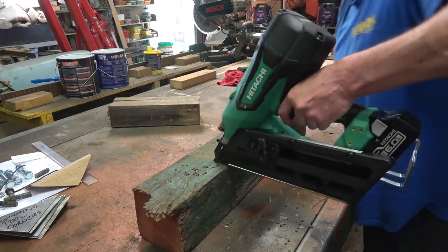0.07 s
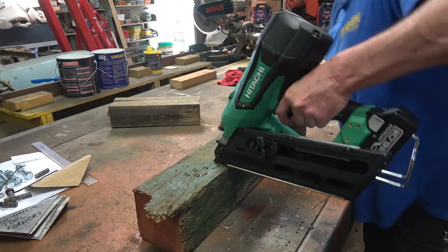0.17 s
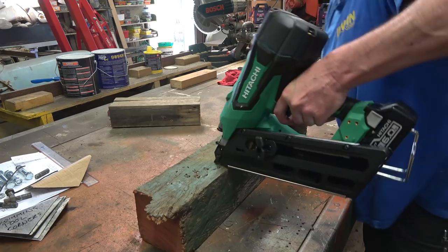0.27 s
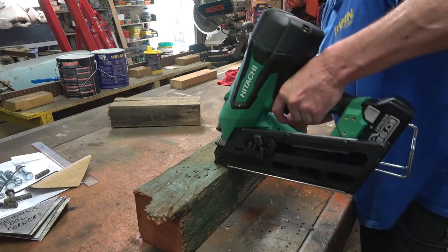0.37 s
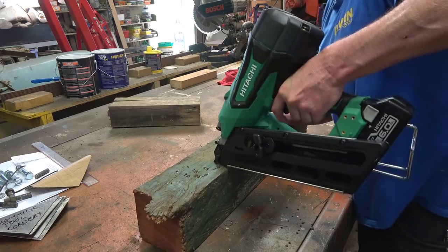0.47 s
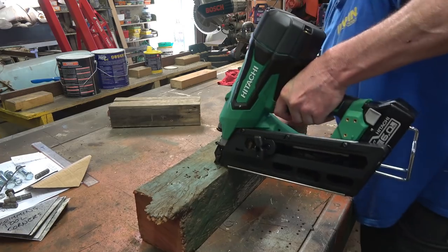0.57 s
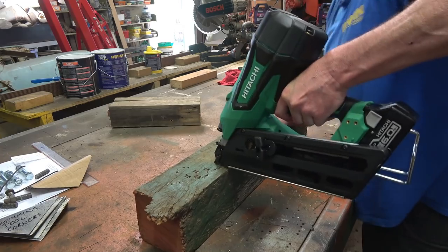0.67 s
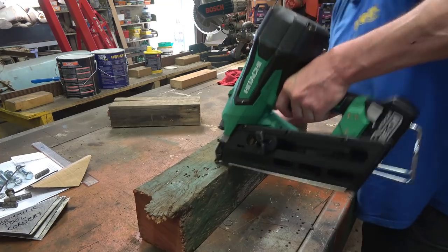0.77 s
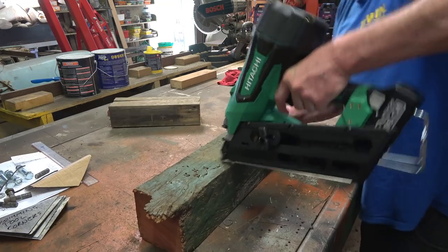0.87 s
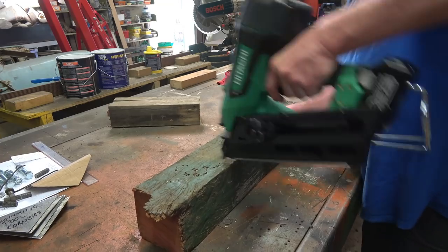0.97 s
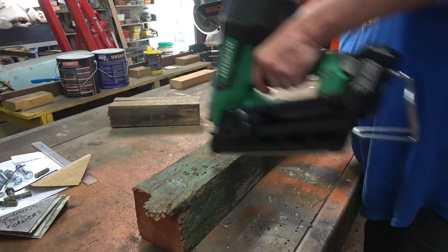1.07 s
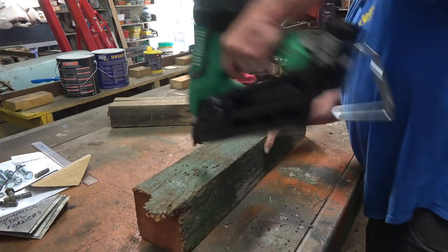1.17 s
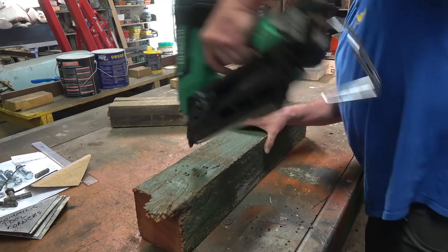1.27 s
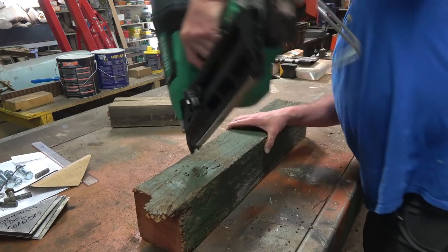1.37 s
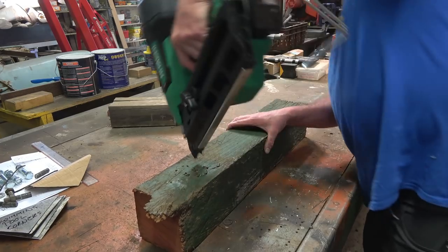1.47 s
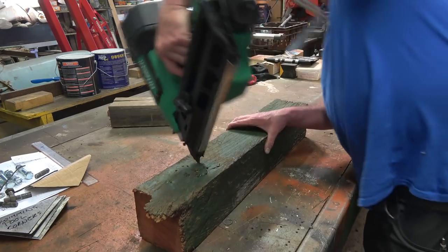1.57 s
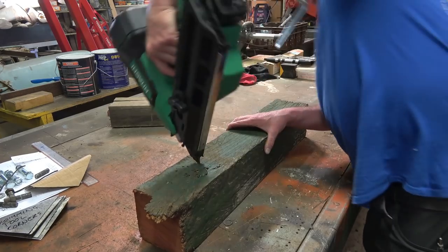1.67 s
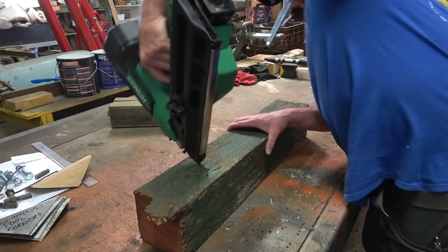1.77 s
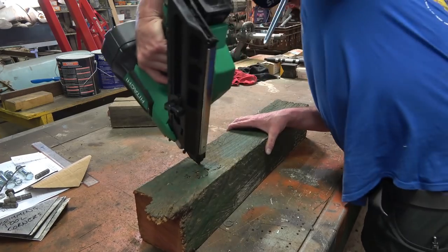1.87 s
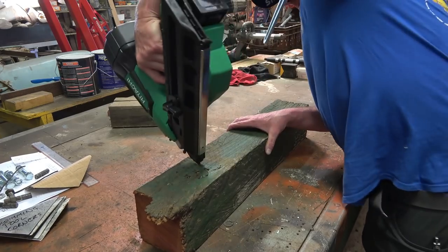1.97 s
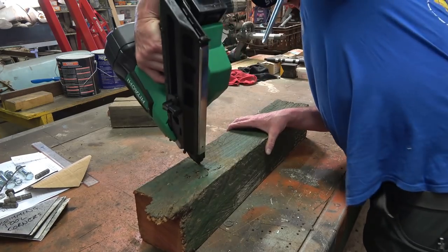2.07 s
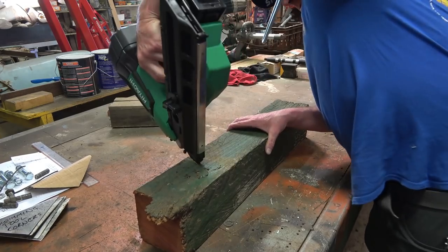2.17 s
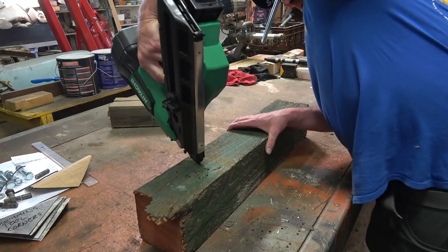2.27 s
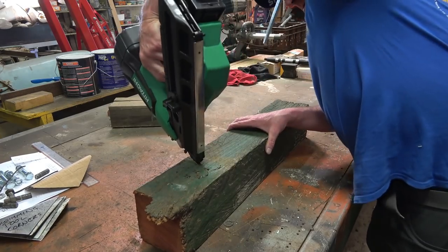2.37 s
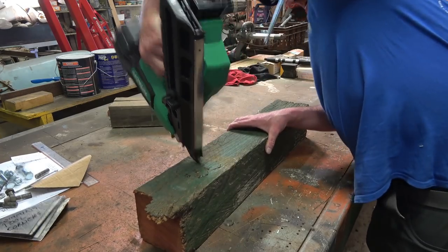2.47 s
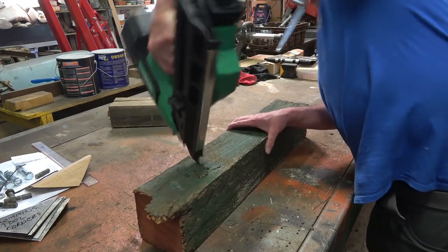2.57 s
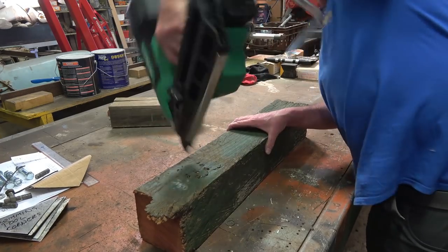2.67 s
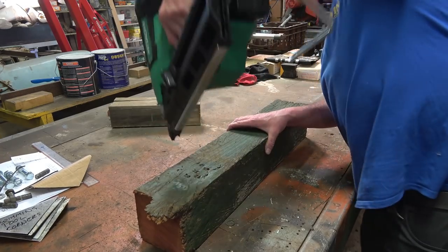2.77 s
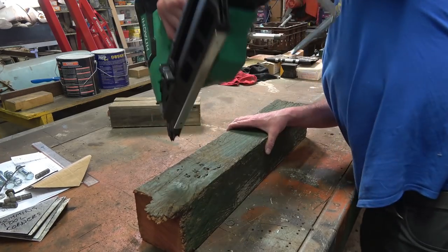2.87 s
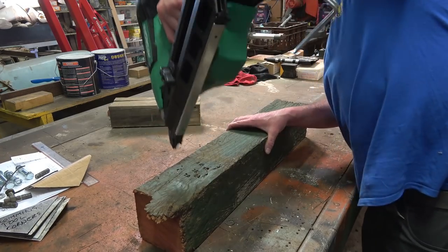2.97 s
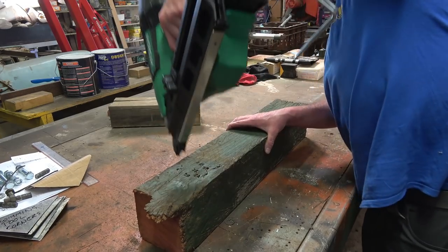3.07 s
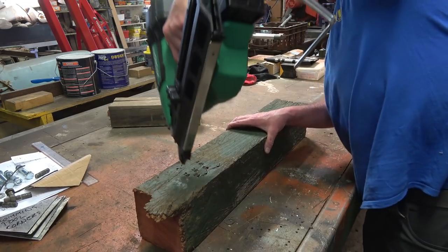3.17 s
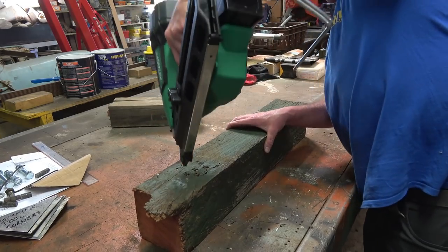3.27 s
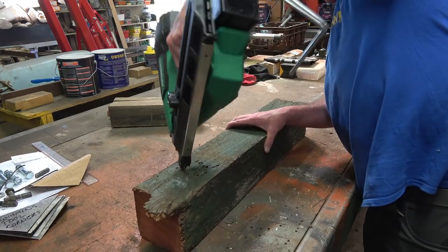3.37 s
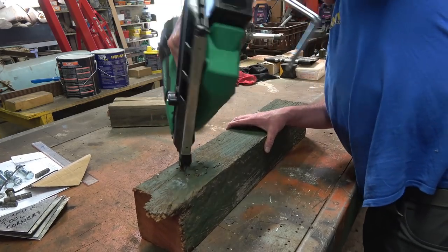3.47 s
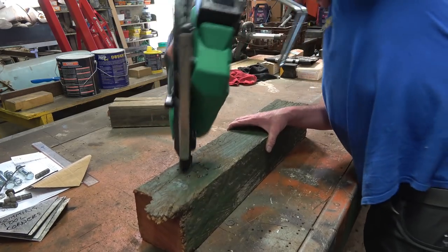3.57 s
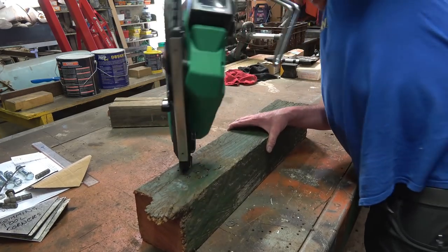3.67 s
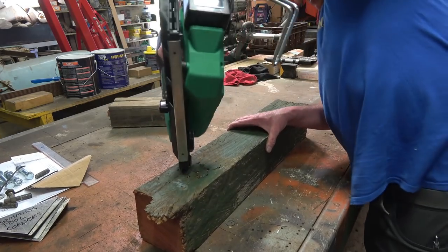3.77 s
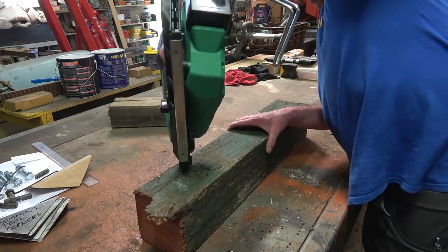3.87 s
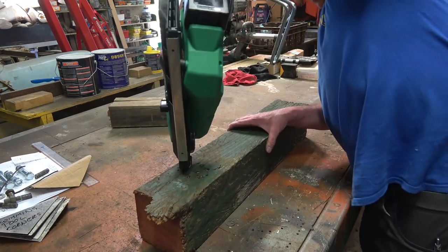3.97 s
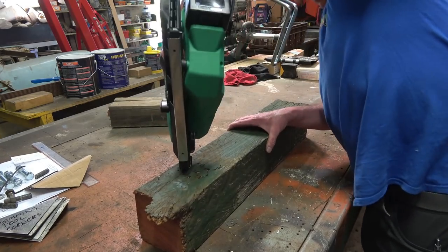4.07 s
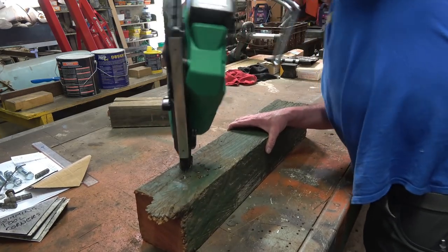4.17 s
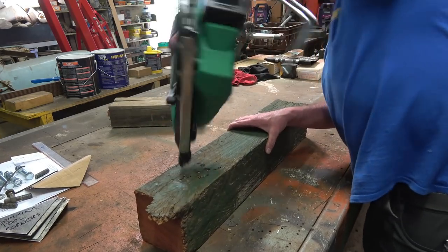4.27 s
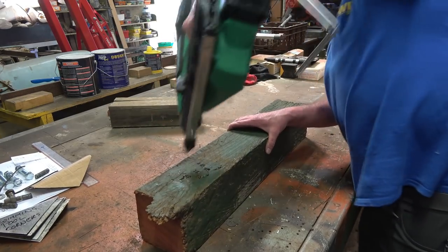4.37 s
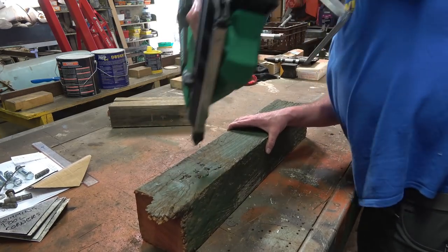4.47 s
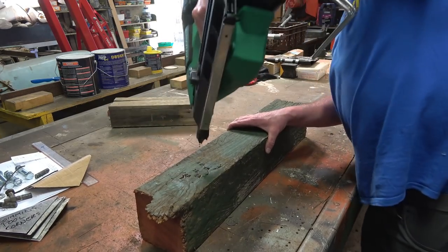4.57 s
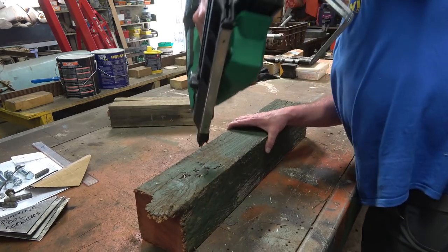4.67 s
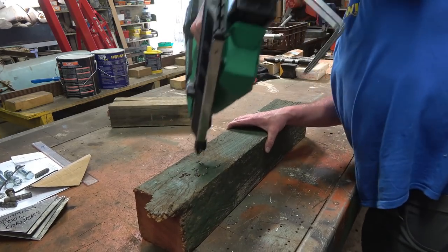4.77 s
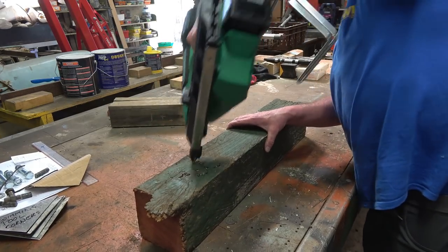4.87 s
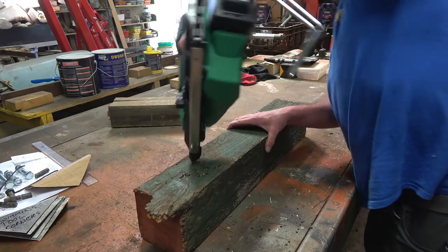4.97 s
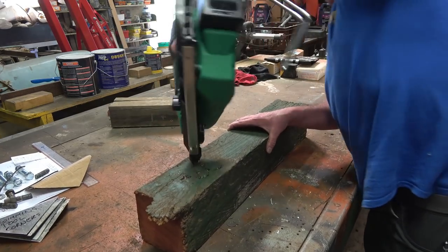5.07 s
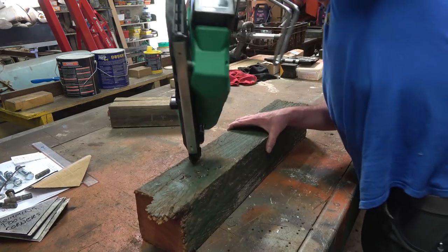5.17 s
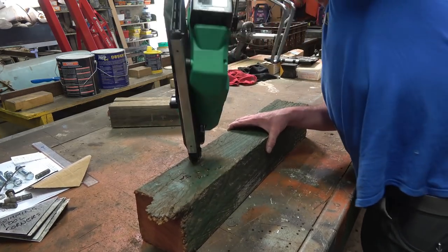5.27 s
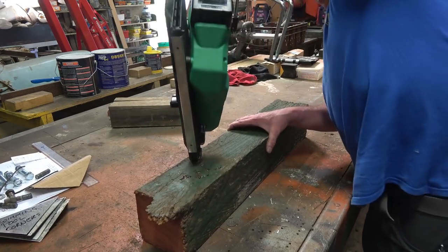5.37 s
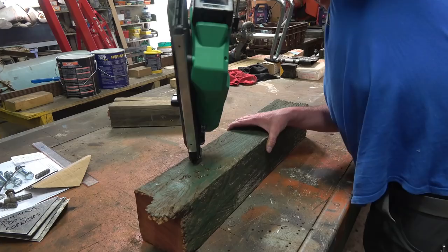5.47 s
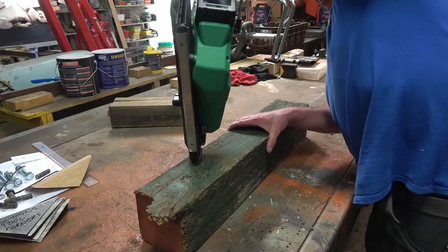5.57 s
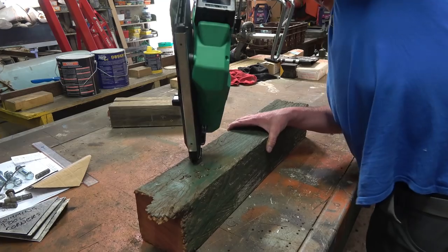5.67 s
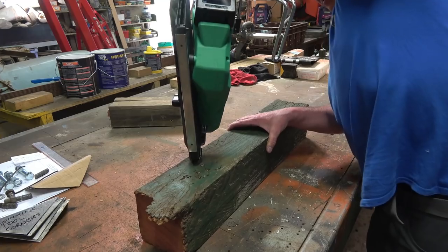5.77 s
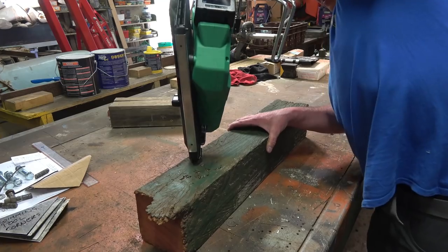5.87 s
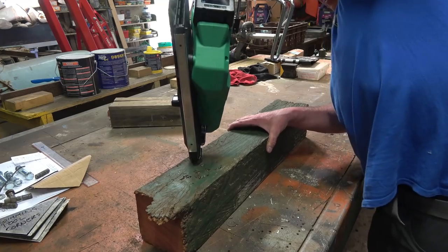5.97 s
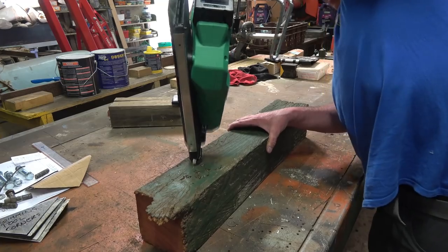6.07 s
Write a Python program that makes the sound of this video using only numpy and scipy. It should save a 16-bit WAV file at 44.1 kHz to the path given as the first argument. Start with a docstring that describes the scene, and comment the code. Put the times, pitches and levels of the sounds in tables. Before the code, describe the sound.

Hard plastic and metal knocks open the scene, with dull hand rubbing and a rattling nail strip. A nose touch and a stop thud precede each of three violent bangs, at roughly two-second spacing. After each bang a rough whine falls for a third of a second; the last is cut off early. Near stereo microphone, bangs flattened by limiting, dense short room echoes, faint low background noise.

```python
"""Bangs of a framing nailer: it is handled, pressed onto a timber on a workbench and fired three times.
Presses touch, may rasp as the nose slides in, and stop with a thud: filtered noise bursts and bench modes.
A shot clicks, rattles (geared motor, coloured noise), cracks and shudders (driver, noise and modes), then
whines downward (sine orders of the gear mesh) as the gears wind the piston back.
Random echoes make the small workshop; a fast limiter flattens the bangs."""
import sys
import numpy as np
from scipy import signal
from scipy.fft import rfft, irfft, next_fast_len
from scipy.io import wavfile
from scipy.ndimage import uniform_filter1d, minimum_filter1d

SR = 44100
rng = np.random.default_rng(int(sys.argv[2]) if len(sys.argv) > 2 else 0)


def log_audio(samples):
    """Write samples as a 16-bit WAV file to the path given in sys.argv[1]."""
    # one column per channel
    frames = np.atleast_2d(samples).T
    # limit to full scale, then quantise
    limited = np.clip(frames, -1, 1)
    pcm = np.round(limited * 32767).astype(np.int16)
    wavfile.write(sys.argv[1], SR, pcm)


N = 270222
BINS = np.fft.rfftfreq(4096, 1 / SR)  # Hz, filter design grid

# Shots: motor start t/s, blow level/dB, motor level/dB, rebound thud level/dB, shriek f/Hz,
# gear pitch before overrun f/Hz, housing resonance gain/dB, 2nd gear line level/dB, 3rd gear line level/dB
SHOTS = [(2.386, 5.5, -15.5, -3, 2700, 2655, 9.5, -25, -27.5),
         (4.034, 2, -17, -8, 2477, 2629, 13, -28.5, -23), (6.014, 3, -14, -6, 2630, 2660, 9, -28, -28)]
# Modes of the tool housing: f/Hz, width/Hz, gain/dB
HOUSING = [(1200, 90, 4.5), (2283, 460, 6), (2800, 350, -0.5), (3450, 300, 1.5), (5300, 600, 4.5),
           (6200, 170, 3), (7920, 780, 6.5)]
# Modes of timber and bench: f/Hz, level/dB, t60/s
BENCH = [(81, -15.5, .4), (102.9, -8, 0.35), (112.7, -0.5, 0.42), (145, 0.5, 0.22), (161.1, 2, 0.25),
         (187.7, -3.5, 0.25), (233.2, -10.5, .3), (288.7, -12.5, 0.29), (398, -17.5, 0.3),
         (466, -20.5, 0.17), (647, -15, 0.36), (760.4, -14.5, 0.12)]
# Broad spectrum of a clack: f/Hz, density/dB per Hz
CLACK = [(60, -14), (200, -3), (450, -6.5), (750, -0.5), (1000, 0.5), (1600, 2.5), (4200, -2), (7000, -4.5),
         (10000, -5), (12500, -16), (16000, -20)]

# Shot timing after motor start: driver let go, gears take up the piston, end of cycle
STRIKE_S, WIND_S, CYCLE_S = .054, .095, .43


def amp(db):
    """Converts dB to amplitude."""
    return 10 ** (np.asarray(db) / 20)


def unit(x):
    """Scales to rms 1."""
    return x / np.sqrt(np.mean(x ** 2) + 1e-20)


def read(points, hz):
    """Reads a table on a log-frequency axis."""
    f, value = np.transpose(points)
    return np.interp(np.log(hz + 1), np.log(f + 1), value)


def hump(hz, width_hz, at_hz=BINS):
    """Bell of height 1 around hz, read at the given frequencies."""
    return 1 / (1 + (2 * (at_hz - hz) / width_hz) ** 2)


def add(mix, s, sound):
    """Adds a sound to the mix from time s, cut at the end."""
    part = mix[max(round(s * SR), 0):][:len(sound)]
    part += sound[:len(part)]


def seconds(length_s):
    """Time axis in s."""
    return np.arange(int(length_s * SR)) / SR


def colour(x, gain_db):
    """Causal minimum-phase filter with the given gain at BINS."""
    log_gain = np.log(amp(np.r_[gain_db, gain_db[-2:0:-1]]))
    spectrum = np.exp(np.conj(signal.hilbert(log_gain)))
    taps = np.fft.ifft(spectrum).real
    return signal.oaconvolve(x, taps)[:len(x)]


def noise(gain_db, size):
    """Coloured noise of rms 1."""
    white = rng.standard_normal(size + len(BINS))
    return unit(colour(white, gain_db)[len(BINS):])


def wander(hz, size):
    """Slow random signal of rms about 1, rolled off above hz."""
    span = next_fast_len(size + SR // 2)
    rolloff = 1 + (np.fft.rfftfreq(span, 1 / SR) / hz) ** 4
    spectrum = rfft(rng.standard_normal(span)) / rolloff
    return unit(irfft(spectrum, span))[:size]


def noise_floor(floor_db=-55):
    """Steady background noise, strongest in the bass."""
    # Floor spectrum: f/Hz, density/dB per Hz
    floor_spectrum = [(20, 0.5), (45, 4), (80, 1), (115, -0.5), (200, -7), (600, -3.5), (1500, -12.5),
                      (4000, -14), (8000, -26.5), (15000, -33.5)]
    return amp(floor_db) * noise(read(floor_spectrum, BINS), N)


def workshop(x, gap_s=.003, onset_s=0.0047, echoes_per_s=4000):
    """Dense reflections from cluttered shelves, each band dying at its own speed."""
    # Room gain: f/Hz, gain/dB
    room_colour = [(60, -1), (130, -3), (400, -2), (1000, -2), (2500, 0), (5000, -2), (9000, -4),
                   (15000, -1)]
    # Room decay: f/Hz, t60/s
    room_t60 = [(100, 0.75), (300, 0.61), (700, 0.71), (1500, 0.48), (3000, 0.61), (6000, 0.57),
                (10000, 0.38), (15000, 0.29)]
    t = seconds(0.72)
    taps = rng.choice([-1., 1.], len(t)) * (rng.random(len(t)) < echoes_per_s / SR)
    taps *= np.clip((t - gap_s) / onset_s, 0, 1)
    hz, when, bands = signal.stft(taps, SR, nperseg=256)
    decay_db = -60 * when / read(room_t60, hz)[:, None]
    tail = signal.istft(bands * amp(decay_db), SR, nperseg=256)[1]
    wet = signal.fftconvolve(x, tail / np.linalg.norm(tail))[:N]
    return colour(wet, read(room_colour, BINS))


def rubbing(rise_s=0.048):
    """Dull friction noise that swells quickly and dies away each time the hands shift."""
    # Hand shifts: loudest t/s, level/dB, t60/s
    shifts = [(.11, -26.5, .3), (.32, -34.5, 0.82), (.7, -48.5, 0.46), (1.09, -45, 0.61), (2.0, -34.5, 1),
              (3.719, -32.5, 0.68), (3.93, -41.5, 0.94), (5.11, -32.5, 0.74), (5.45, -52, 1),
              (5.739, -43, 0.97), (5.95, -47.5, 0.71)]
    # Friction spectrum: f/Hz, density/dB per Hz
    rub_spectrum = [(25, -5.5), (60, -3), (110, 3.5), (200, -9.5), (290, -10.5), (430, -12.5), (620, -19),
                    (900, -25.5), (2000, -26), (6000, -35), (15000, -51.5)]
    level, t = np.zeros(N), seconds(1.2)
    for s, db, t60 in shifts:
        fade_db = -60 * np.maximum(t - rise_s, 0) / t60
        add(level, s - rise_s, np.minimum(t / rise_s, 1) * amp(db + fade_db))
    return level * amp(2 * wander(25, N)) * noise(read(rub_spectrum, BINS), N)


def small_sounds(hiss_s=5.517, hiss_db=-38, hiss_t60=0.27, ping_t60=0.036):
    """Decaying sines with noise: a faint ping, then higher, even ticks; one short bright hiss."""
    # Single faint ping: t/s, gain/dB, f/Hz
    ping = (1.988, -33, 7650)
    # Hiss spectrum: f/Hz, density/dB per Hz
    hiss_spectrum = [(500, -41.5), (3000, -8.5), (5300, -6), (9000, -3), (12000, -1), (16000, -14)]
    first_s, gap_s, count = 2.091, .0803, 4
    tick_gain_db, tick_hz = -38.5, 10750
    out, t = np.zeros(N), seconds(0.47)
    hiss_tone_db = read(hiss_spectrum, BINS)
    ticks = [(first_s + k * gap_s, tick_gain_db, tick_hz) for k in range(count)]
    for s, db, hz in ticks + [ping]:
        body = 0.32 * np.sin(2 * np.pi * hz * t) + 0.31 * noise(hiss_tone_db, len(t))
        add(out, s, amp(db - 60 * t / ping_t60) * body)
    add(out, hiss_s, amp(hiss_db - 60 * t / hiss_t60) * noise(hiss_tone_db, len(t)))
    return out


def slides(rasp_db=9, slide_s=.055):
    """Grainy friction against the nose spring grows up to the stop, sounding two low housing modes."""
    # Slides of the nose: end t/s, end level/dB
    slide_ends = [(.766, -40.5), (1.77, -29), (3.598, -30)]
    out, t = np.zeros(N), seconds(slide_s)
    modes = sum(hump(hz, width_hz) for hz, width_hz, _ in HOUSING[:2])
    tone_db = read(CLACK, BINS) - 5 * np.log2(1 + (BINS / 3000) ** 2) + rasp_db * modes
    for stop_s, db in slide_ends:
        rasp = noise(tone_db, len(t)) * amp(2.3 * wander(200, len(t)))
        swell_db = -14 * (1 - t / t[-1]) ** 2
        add(out, stop_s - slide_s, rasp * amp(db + swell_db))
    return out


def clack_list(light_thud_db=-28):
    """Clacks of handling, pressing and firing: t/s, level/dB, tilt/dB per octave, ring f/Hz, thud/dB."""
    # Knocks as the tool is shifted and lifted: t/s, level/dB, treble tilt/dB per octave, ring f/Hz,
    # bench thud level/dB
    knocks = [(.003, -10.5, 0.5, 6600, -25.5), (.018, -13, -0.5, 1895, -23.5),
              (.5047, -25, -2.5, 2120, -57), (.7565, -32.5, -9, 4700, -51), (.7658, -11, -1, 2980, -25),
              (.875, -31, -4, 2170, -48), (1.494, -44, -2, 1900, -60)]
    # Nose presses: touch t/s, touch level/dB, touch ring f/Hz, stop t/s, stop level/dB, stop ring f/Hz,
    # stop bench thud level/dB
    presses = [(1.5233, -7, 2110, 1.77, -8.5, 3420, -13), (3.3666, -11.5, 1270, 3.5966, -11, 6300, -18.5),
               (4.861, -12, 1104, 4.999, -17, 6400, -17.5)]
    # Nail strip jumps in the magazine and falls back: jump t/s, jump level/dB, fall level/dB
    rattles = [(.8185, -24.5, -46), (1.608, -18.5, -22.5), (3.431, -19.5, -23)]
    # Trigger, switch, end latch: delay from motor start t/s, level/dB, treble tilt/dB per octave, ring f/Hz
    switching = [(-.025, -34, -4, 1650), (-.012, -23, -2.5, 2410), (.415, -15.5, 0.5, 2160)]
    touch_tilt_db, touch_thud_db, stop_tilt_db = 1.5, -12, -0.5  # tilts per octave; thud re touch
    # a tooth of the nose catches just before the full touch
    graze_lead_s, graze_db, graze_tilt_db = .003, -9.5, -3.5
    jump_hz, jump_tilt_db = 2695, -2
    fall_s, fall_hz, fall_tilt_db = .0255, 1220, 2
    rattle_thud_db = -13.5  # re jump or fall

    out = list(knocks)
    for touch_s, touch_db, touch_hz, stop_s, stop_db, stop_hz, thud_db in presses:
        graze_hz = HOUSING[1][0]
        out.append((touch_s - graze_lead_s, touch_db + graze_db, graze_tilt_db, graze_hz,
                    touch_db + light_thud_db))
        out.append((touch_s, touch_db, touch_tilt_db, touch_hz, touch_db + touch_thud_db))
        out.append((stop_s, stop_db, stop_tilt_db, stop_hz, thud_db))
    for s, jump_db, fall_db in rattles:
        out.append((s, jump_db, jump_tilt_db, jump_hz, jump_db + rattle_thud_db))
        out.append((s + fall_s, fall_db, fall_tilt_db, fall_hz, fall_db + rattle_thud_db))
    for start_s, *_ in SHOTS:
        for delay_s, db, tilt_db, hz in switching:
            out.append((start_s + delay_s, db, tilt_db, hz, db + light_thud_db))
    return out


def rail(clack_ring_db=-24, shot_ring_db=-33, width_hz=35):
    """The magazine rail rings after clacks and at cycle end; loose nails blur its modes into noise bands."""
    # Modes of the long rail: f/Hz, level/dB, t60/s
    rail_modes = [(1200, -1.5, 0.21), (2186, -1, .4), (3330, -7, .35), (4050, -9.5, 0.53),
                  (5670, -4.5, 0.25), (6000, -12, 0.45)]
    out, t = np.zeros(N), seconds(.6)
    hits = [(s, db + clack_ring_db) for s, db, *_ in clack_list()]
    hits += [(start_s + CYCLE_S, shot_ring_db) for start_s, *_ in SHOTS]
    for hz, mode_db, t60 in rail_modes:
        power = np.zeros(N)
        for s, db in hits:
            add(power, s, amp(db + mode_db - 60 * t / t60) ** 2)
        carrier = np.sin(2 * np.pi * hz * np.arange(N) / SR)
        out += np.sqrt(2 * power) * wander(width_hz, N) * carrier
    return out


def housing_db():
    """Gain of the tool's hollow body: a broad slope with its modes on top."""
    return read(CLACK, BINS) + sum(hump(hz, width_hz) * db for hz, width_hz, db in HOUSING)


def bench(softness=0, dull_db=7, rise_s=0.0022, soft_rise_s=0.0062, knock_db=-9, knock_t60=0.22):
    """One modal thud; a soft push swells more slowly and stirs mainly the bench top's bending modes."""
    t = seconds(.9)
    ring = np.zeros(len(t))
    for hz, db, t60 in BENCH:
        octaves_off = min(2 * abs(np.log2(hz / 112)), 1)
        mode_db = db - softness * dull_db * (octaves_off - 0.5)
        mode_hz = hz * (1 + .012 * rng.standard_normal())
        ring += amp(mode_db - 60 * t / t60) * np.sin(2 * np.pi * mode_hz * t)
    # many weak, well damped modes between the strong ones: a woody knock
    knock = noise(50 * hump(280, 1100) - 20 * hump(0, 180), len(t))
    knock *= amp(knock_db - softness * dull_db / 2 - 60 * t / knock_t60)
    return (ring + knock) * (1 - np.exp(-t / (rise_s + softness * soft_rise_s)))


def clacks(chatter_t60=0.024, spread_t60=0.036, ring_db=10, clatter_db=-11, clatter_t60=0.28):
    """Metal parts chatter in the housing, loose nails clatter on, and the blow passes into the bench."""
    sharp, spread, dull = np.zeros((3, N))
    t, body_db = seconds(0.11), housing_db()

    def burst(t60, gain_db):
        """Decaying coloured noise, scaled to a set energy."""
        envelope = amp(-60 * t / t60) * (1 - np.exp(-t / 0.0012))
        sound = colour(rng.standard_normal(len(t)) * envelope, gain_db)
        return sound / np.sqrt(np.sum(sound ** 2) / (0.0028 * SR))

    for s, db, tilt_db, hz, thud_db in clack_list():
        slope_db = tilt_db * np.log2(np.maximum(BINS, 700) / 3500)
        tone_db = body_db + slope_db + ring_db * hump(hz, 0.16 * hz)
        chatter = burst(chatter_t60, tone_db)
        clatter = amp(clatter_db) * burst(clatter_t60, tone_db)
        add(sharp, s, amp(db) * (chatter + clatter))
        # the other faces of the tool radiate a blurred, plainer clack into the room
        plain_db = (read(CLACK, BINS) + tone_db + slope_db) / 2
        add(spread, s, amp(db) * burst(spread_t60, plain_db))
        softness = np.clip((-16.5 - thud_db) / 9, 0, 1)  # weaker thuds are softer
        add(dull, s + .003, amp(thud_db) * bench(softness=softness))
    return sharp, spread, dull


def motor(db, shriek_hz, rattle_db=3.0, shriek_db=8, shriek_t60=0.056):
    """Gears rattle under load and ring their box; the jolt of starting makes the housing shriek."""
    # Gear rattle spectrum: f/Hz, density/dB per Hz
    gear_spectrum = [(60, -26.5), (150, -9.5), (300, -12), (700, -15), (1150, -2), (1600, -5), (2100, -2.5),
                     (2450, 2), (3100, -3.5), (4200, -4), (5200, -7.5), (8000, -9), (11000, -16),
                     (16000, -23)]
    # Modes of the gearbox: f/Hz, width/Hz, gain/dB
    gearbox_modes = [(2200, 180, 0.5), (4060, 300, 2), (6200, 350, 1.5)]
    jolt_db, jolt_s, drag_db, ease_db_per_s = 3.5, 0.0031, 2.5, 8
    t = seconds(CYCLE_S)
    # starting jolt, extra drag until the driver is let go, slow easing
    load_db = jolt_db * np.exp(-t / jolt_s) + drag_db * (t < STRIKE_S) - ease_db_per_s * t
    tone_db = read(gear_spectrum, BINS)
    tone_db = tone_db + sum(hump(hz, width_hz) * gain_db for hz, width_hz, gain_db in gearbox_modes)
    rattle = noise(tone_db, len(t)) * amp(rattle_db * wander(350, len(t)) + load_db)
    shriek = noise(36 * hump(shriek_hz, 1300), len(t))
    shriek *= amp(shriek_db - 60 * abs(t - .01) / shriek_t60)
    return amp(db) * (rattle + shriek) * signal.windows.tukey(len(t), .02)


def whine(gear_hz, resonance_db, second_db, third_db, half_db=-23, beat_db=-25):
    """The mesh tone falls as the air spring stiffens; under load other, rougher gear stages join in."""
    # free-running overrun is lost first, then a steady slowing
    overrun_hz, overrun_s, sag_hz_per_s = 68.2, .035, 1850
    level_db, rise_s, fade_db = -16.5, 0.029, 15
    resonance_hz, resonance_width_hz = 2405, 85  # of the housing, swept by the tone
    t = seconds(CYCLE_S - WIND_S)
    hz = gear_hz + overrun_hz * np.exp(-t / overrun_s) - sag_hz_per_s * t
    db = level_db + resonance_db * hump(resonance_hz, resonance_width_hz, hz) - fade_db * (t / t[-1]) ** 4
    turns = np.cumsum(hz * (1 + .003 * wander(80, len(t)))) / SR
    mesh_level = np.minimum(t / rise_s, 1) * amp(db + 0.92 * wander(90, len(t)))
    out = mesh_level * np.sin(2 * np.pi * turns)
    strain = np.interp(t, [.11, .22, .27, .335], [0, 0.79, 0.85, 0.51])
    orders = [.505, .965, 1.1, 1.165, 1.92, 2.9, 4.0]  # re mesh frequency
    orders_db = [half_db, beat_db, beat_db, beat_db, second_db, third_db, -35]
    for order, order_db in zip(orders, orders_db):
        backlash_rad = .3 * np.sqrt(order) * wander(110, len(t))
        line_level = strain * amp(order_db + 0.84 * wander(70, len(t)))
        out += line_level * np.sin(2 * np.pi * order * turns + backlash_rad)
    return np.sqrt(2) * out * signal.windows.tukey(len(t), .05)


def blow(crack_db=5, crack_t60=0.049, shudder_t60=0.32, thud_db=-13):
    """The driver cracks on the nail; timber, bench and all on it shudder, loudest at the bench's modes."""
    # Shudder spectrum: f/Hz, density/dB per Hz
    shudder_spectrum = [(30, -31), (70, -16.5), (110, -4), (160, 1.5), (250, -1), (420, -3), (720, 0),
                        (1200, -4.5), (2000, -12.5), (4000, -17), (8000, -18), (12000, -22), (16000, -38.5)]
    t = seconds(.9)
    crack = noise(housing_db() + 5 * hump(15000, 8000), len(t)) * amp(crack_db - 60 * t / crack_t60)
    body_db = read(shudder_spectrum, BINS) + 2.87 * sum(hump(hz, 28) for hz, _, _ in BENCH)
    shudder = noise(body_db, len(t)) * amp(2 * wander(180, len(t)) - 60 * t / shudder_t60)
    shudder *= 1 - np.exp(-t / 0.0046)
    return crack + shudder + amp(thud_db) * bench()


def scene(clack_room_db=-7, thud_room_db=-10, shot_room_db=-7, whine_room_db=-11.5, rebound_s=.038):
    """All sources, the room, and a narrow stereo microphone."""
    # Stereo width: f/Hz, side re mid/dB
    width = [(30, -11.5), (80, -14.5), (250, -17.5), (1000, -25.5), (2500, -24), (4500, -22), (8000, -8),
             (10500, -11), (13000, -26)]
    # Stereo lean: f/Hz, left re right/dB
    lean = [(40, -3), (140, 6.5), (220, 1), (330, 1.5), (800, -0.5), (9000, 0.5)]
    shots, tones = np.zeros((2, N))
    for start_s, blow_db, motor_db, rebound_db, shriek_hz, *whine_settings in SHOTS:
        strike_s = start_s + STRIKE_S
        add(shots, start_s, motor(motor_db, shriek_hz))
        add(shots, strike_s, amp(blow_db) * blow())
        add(shots, strike_s + rebound_s, amp(rebound_db) * bench())  # timber drops back on the bench
        add(tones, start_s + WIND_S, whine(*whine_settings))
    sharp, spread, dull = clacks()
    near = slides() + rubbing() + small_sounds() + dull
    send = amp(clack_room_db) * spread + amp(thud_room_db) * near
    send += amp(shot_room_db) * shots + amp(whine_room_db) * tones
    mid = sharp + rail() + near + shots + tones + workshop(send) + noise_floor()
    # the two ports differ in the room they hear and, by a quarter turn, in the near sound
    difference = amp(1.5) * workshop(send) + amp(-3) * signal.hilbert(mid).imag
    side = colour(difference, read(width, BINS))
    lean_db = read(lean, BINS) / 2
    return np.array([colour(mid + side, lean_db), colour(mid - side, -lean_db)])


def record(dry, ceiling_db=-1.5, recovery_db_per_s=260, makeup_db=1.0, low_cut_hz=56, edge_hz=15950):
    """A fast peak limiter, a rumble filter, soft overload, and the band limit."""
    peak = -minimum_filter1d(-abs(dry).max(0), size=40)
    peak_db = 20 * np.log10(uniform_filter1d(peak, size=40) + 1e-9)
    fall_db = np.arange(N) * recovery_db_per_s / SR
    held_peak_db = np.maximum.accumulate(peak_db + fall_db) - fall_db  # instant rise, linear fall
    over_db = np.maximum(held_peak_db - ceiling_db, 0)
    held = amp(makeup_db) * dry / amp(uniform_filter1d(over_db, size=30))
    held = signal.lfilter(*signal.butter(2, low_cut_hz, "high", fs=SR), held)
    held = held / (1 + held ** 8) ** (1 / 8)
    band_taps = signal.firwin(301, edge_hz, window=("kaiser", 8), fs=SR)
    return signal.oaconvolve(held, band_taps[None], "same")


dry = scene()
out = record(dry)
log_audio(out)
```